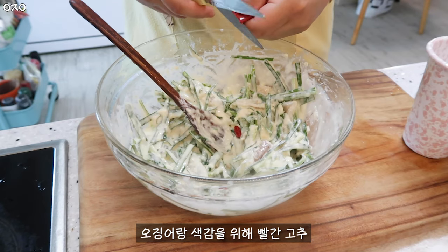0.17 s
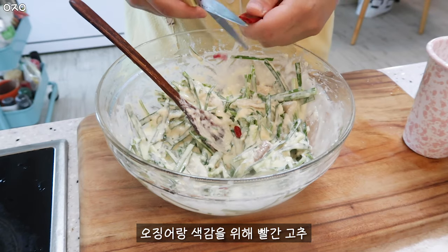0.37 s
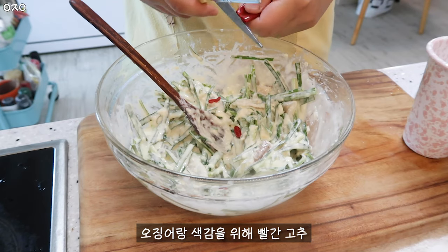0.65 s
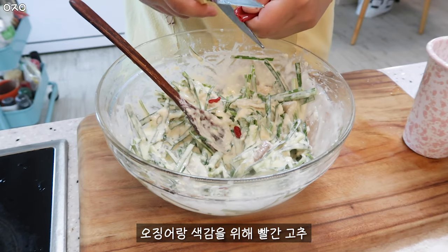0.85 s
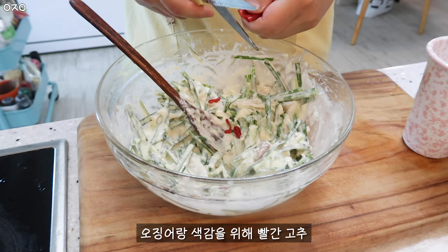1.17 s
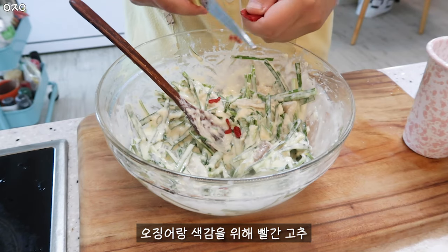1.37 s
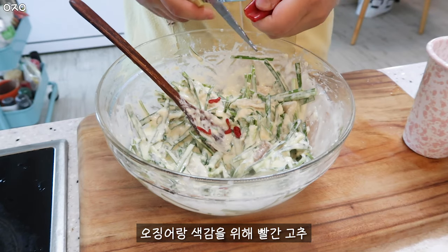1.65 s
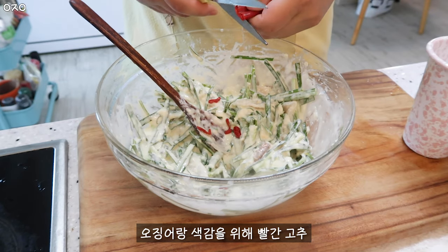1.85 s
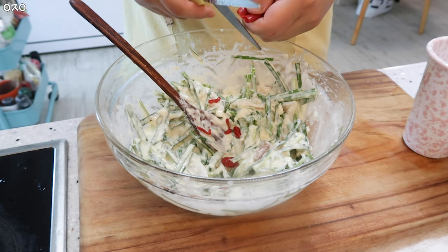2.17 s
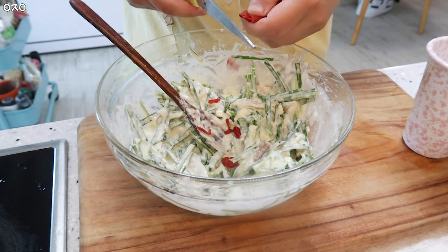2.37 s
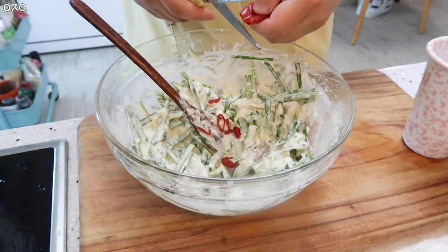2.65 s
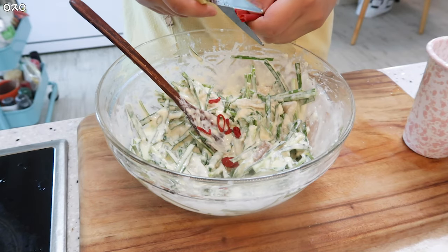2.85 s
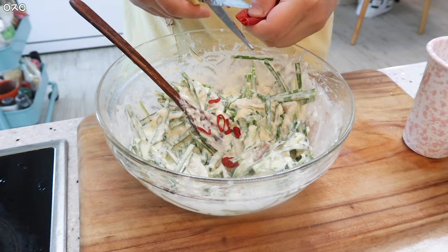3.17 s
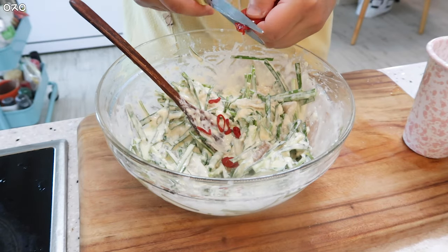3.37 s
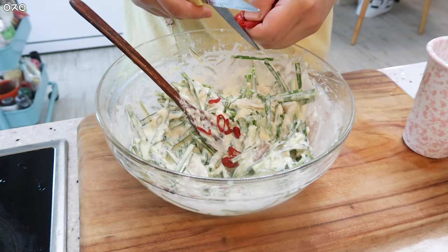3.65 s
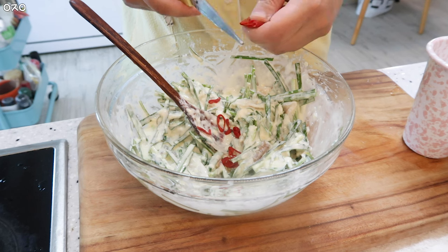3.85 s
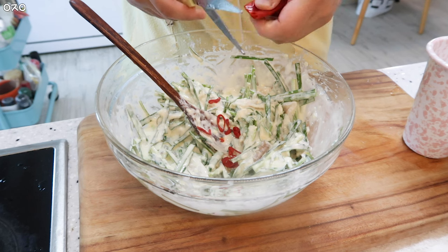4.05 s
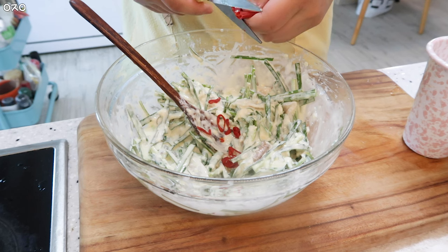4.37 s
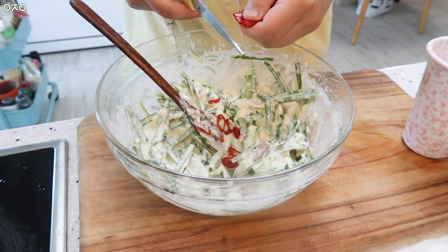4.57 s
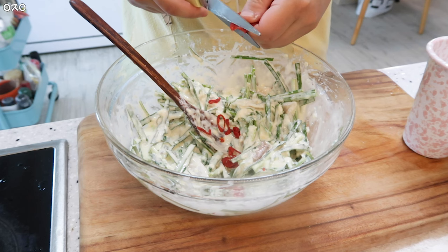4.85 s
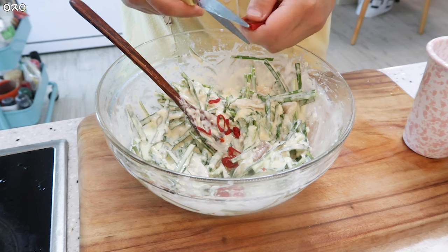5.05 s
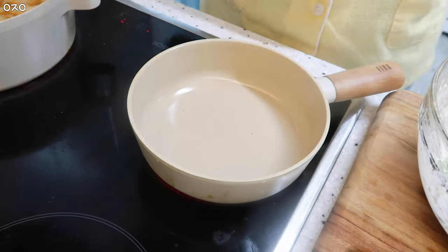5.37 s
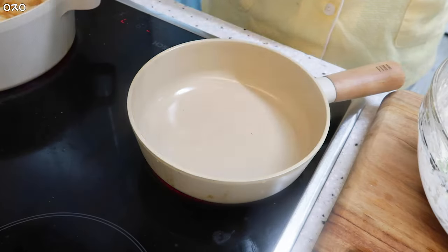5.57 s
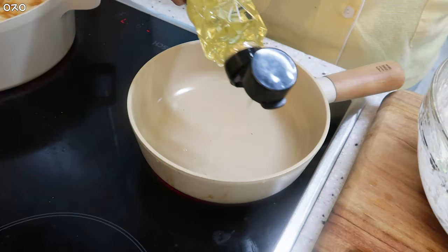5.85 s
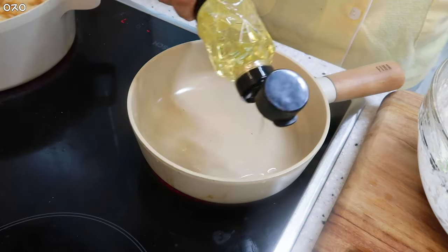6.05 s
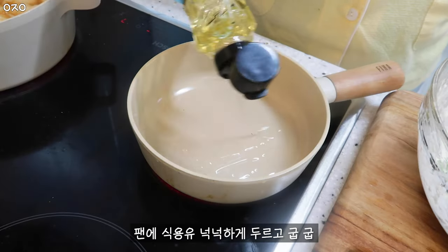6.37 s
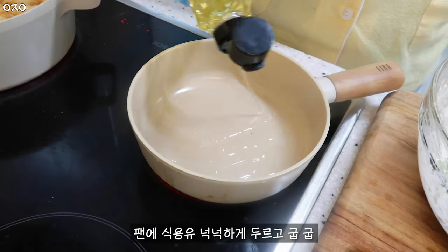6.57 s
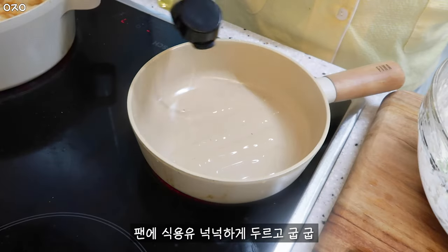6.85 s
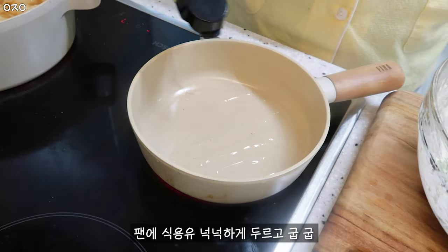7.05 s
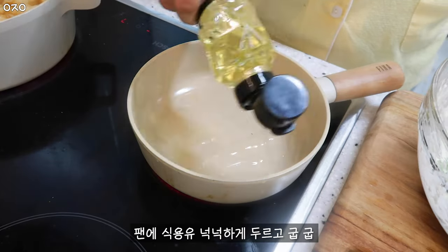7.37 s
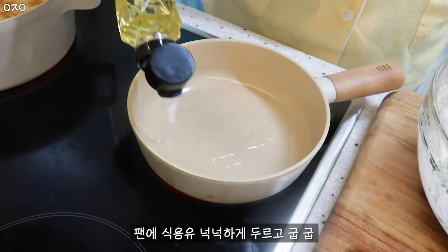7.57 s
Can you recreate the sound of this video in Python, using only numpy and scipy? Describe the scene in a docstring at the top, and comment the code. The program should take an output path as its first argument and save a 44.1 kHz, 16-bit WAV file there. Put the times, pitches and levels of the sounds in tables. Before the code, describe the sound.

Kitchen scissors slide, tick and snap shut, followed by a plastic bottle crinkling and gulping air, with appliance hum and faint hiss behind.

```python
"""Scissors snip a pepper over a bowl in a home kitchen: the blades slide, crunch, tick and snap shut.
Then, close to the louder hob, an oil bottle is squeezed over a pan. Its wall crackles as it flips in
and out, and it glugs as it gulps air. Appliances hum below it all, and a wide, steady summer hiss,
likely far insects, comes in from outside."""
import sys
import numpy as np
from scipy import signal
from scipy.fft import rfft, irfft, next_fast_len
from scipy.io import wavfile

SR = 44100
rng = np.random.default_rng(int(sys.argv[2]) if len(sys.argv) > 2 else 0)


def master(y):
    """Save y as 16-bit WAV."""
    cut = np.clip(np.atleast_2d(y).T, -1, 1)
    pcm = np.round(cut * 32767)  # scale
    wavfile.write(sys.argv[1], SR, pcm.astype(np.int16))


N = 340452
HOB_START_S = 5.398   # from here on we listen by the hob

# The tone of the room by the bowl and by the hob, in the centre (mid) and at the sides.
# Each row: frequency in Hz, strength in dB.
BOWL_MID = [(12, -6), (20, -1.5), (39, -0.5), (59, -8), (124, -7.5), (198, -10.5), (235, -15), (273, -12.5),
            (473, -18), (694, -19.5), (1230, -24), (2880, -28.5), (3200, -30), (4160, -23)]
BOWL_SIDE = [(20, -29), (164, -1.5), (207, -3), (303, 0.5), (538, -6), (1520, -13.5), (3200, -19.5),
             (4160, -60)]
HOB_MID = [(12, -47), (20, 3), (63, -4), (95, 1), (114, 8.5), (140, 0), (180, -4.5), (230, 1.5), (285, -5),
           (345, -1.5), (621, -25.5), (906, -27), (990, -4), (1290, -35), (1580, -12.5), (2150, -19.5),
           (4000, -39), (5200, -60)]
HOB_SIDE = [(20, -55), (108, -10), (280, -1.5), (436, -4.5), (926, -14), (1540, -8), (1920, -20),
            (4000, -14), (5200, -71)]
# Wavering motor tones. Each row: pitch in Hz, width in Hz, level in dB.
MOTOR_TONES = [(123.2, 18.3, -57.5), (234.4, 13.4, -61), (339.4, 22, -69), (695, 90, -72)]
# Random swells and dips of a deep 30 Hz hum. Each row: time in seconds, level in dB.
DEEP_HUM_LEVELS = [(0.0, -55), (0.65, -65.5), (3.2, -54), (3.9, -81), (4.25, -57), (5.7, -79), (7.72, -58)]
# The tone of the outdoor hiss, centre and sides. Each row: frequency in Hz, strength in dB.
HISS_MID = [(1760, -65), (3000, -10), (3250, -3), (3550, 5), (3940, -2), (4490, 1.5), (4840, -1.5),
            (6150, -2.5), (8030, -12), (9190, -24.5), (9870, -37), (11000, -68), (15000, -76)]
HISS_SIDE = [(1760, -53), (3000, -12), (3210, -31), (3600, -4.5), (4030, -9.5), (4550, -5), (6690, -6.5),
             (8990, -14.5), (11500, -18.5), (13300, -25), (15000, -96)]
# The loudness of that hiss, lower by the hob. Each row: time in seconds, level in dB.
HISS_LEVELS = [(0, -54), (2.5, -56), (5.38, -58), (5.41, -62), (7.72, -61)]
# Blades sliding through the pepper. Each row: end in seconds, level in dB, length in seconds.
SLIDES = [(0.295, -63.5, 0.11), (0.821, -71.5, 0.022), (1.041, -62, 0.064), (1.414, -62.5, 0.11),
          (2.052, -62.5, 0.18), (2.408, -56, 0.14), (2.528, -69, 0.022), (3.057, -59.5, 0.15),
          (3.408, -63.5, 0.051), (3.472, -58.5, 0.029), (3.868, -57.5, 0.14), (4.569, -57.5, 0.18),
          (4.993, -55.5, 0.15)]
# The tone of sliding blades and of their rattle. Each row: frequency in Hz, strength in dB.
SLIDE_TONE = [(1300, 2), (2250, 11.5), (5000, -1), (8500, -0.5), (12000, -1.5), (14500, -6), (15600, -20)]
RATTLE_TONE = [(240, -20), (400, -7), (1510, -11.5), (2000, -18.5), (2990, -7.5), (3250, -13.5),
               (4110, -11), (7460, -16.5), (11000, -37), (14300, -76)]
# Ticks of the pivot and of falling slices. Each row: start in seconds, level in dB, pitch in Hz.
TICKS = [(0.307, -37.5, 2180), (0.3401, -39, 2700), (0.373, -34.5, 2420), (0.601, -33, 2170),
         (1.057, -42, 2130), (1.3955, -45, 2050), (1.434, -39.5, 2240), (1.463, -38.5, 2700),
         (2.059, -43, 2110), (2.366, -44, 2770), (2.687, -39, 1760), (4.162, -50, 1690),
         (4.5133, -46, 2340), (4.567, -36, 2830), (4.6026, -36.5, 2700)]
# Blades shutting. Each row: start in seconds, level in dB, then rattle, handles and knock in dB
# above that level, then the favoured pitches of the knock and of the blades in Hz.
SNAPS = [(2.4207, -22, -21.5, -5.5, -15.5, 604, 3520), (3.061, -27.5, -29, -4, -13.5, 610, 2780),
         (3.474, -42.5, -8, 8.5, 7, 700, 2200), (3.88, -17.5, -21, -7, -16, 910, 3800),
         (4.9971, -13.5, -22, -6, -15, 1200, 4460)]
# Modes are the pitches a thing rings at: here finger loops, steel blades, plastic handles and bottle.
# Each row: pitch in Hz, width in Hz (wider dies sooner), strength in dB.
LOOP_MODES = [(550, 77, 0), (1056, 32, 2.5)]
BLADE_MODES = [(2440, 130, 2.5), (2700, 33, 4), (3150, 60, 0.5), (3740, 150, 6), (4500, 52, -5.5),
               (5160, 18, 5.5), (6350, 200, -14), (7100, 300, 2.5), (11000, 300, -1)]
HANDLE_MODES = [(1290, 170, 0), (1900, 320, 6)]
BOTTLE_MODES = [(974, 11, 16), (1120, 110, 14.5), (1630, 260, 14.5), (1950, 30, 11.5), (2130, 16, 12.5),
                (2700, 96, 14.5), (3270, 130, 15), (4020, 230, 17.5)]
# How hard the bottle is worked. Each row: time in seconds, level of its fine crackle in dB.
SQUEEZE_LEVELS = [(5.47, -44.5), (5.58, -45), (5.63, -51.5), (5.85, -48.5), (6.32, -45.5), (6.5, -42.5),
                  (6.63, -42), (6.96, -47), (7.38, -46), (7.54, -51.5), (7.72, -42)]
# The tone of that fine crackle. Each row: frequency in Hz, strength in dB.
CRACKLE_TONE = [(240, -41), (400, -18.5), (510, -0.5), (617, -28), (686, -6), (1250, -8.5), (2060, -7),
                (2800, -9.5), (3720, -26), (5000, -23.5), (6500, -60)]
# Loud pops of the wall. Each row: time in seconds, level in dB, favoured pitch in Hz, fade in seconds.
POPS = [(5.41, -33, 1780, 0.011), (5.445, -29.5, 1630, 0.004), (5.497, -45, 2700, .012),
        (5.504, -32, 1950, 0.027), (5.53, -27, 1580, 0.0076), (5.573, -36, 1750, 0.012),
        (5.591, -27.5, 2400, 0.018), (5.662, -37.5, 1630, .008), (5.694, -35, 1570, 0.0031),
        (5.771, -22.5, 1980, 0.012), (5.814, -33.5, 2130, 0.026), (5.878, -34, 1980, 0.0087),
        (5.953, -31, 1630, 0.0035), (5.964, -28.5, 1670, 0.0072), (5.9962, -22.5, 2720, 0.00092),
        (6.017, -31, 2030, 0.018), (6.045, -29.5, 1600, 0.013), (6.109, -26.5, 2100, 0.011),
        (6.127, -27.5, 1630, 0.01), (6.165, -33, 1670, 0.0033), (6.189, -27.5, 2520, 0.0086),
        (6.1972, -20, 2250, 0.011), (6.244, -34, 1290, 0.0035), (6.256, -37, 2600, 0.0067),
        (6.2845, -27, 2450, 0.0005), (6.292, -24, 1760, 0.016), (6.389, -30.5, 1700, 0.016),
        (6.446, -29, 1630, 0.0077), (6.474, -28.5, 2130, 0.022), (6.516, -29, 1420, 0.0075),
        (6.5385, -21, 1390, 0.0072), (6.593, -29, 2090, 0.016), (6.621, -31.5, 2600, 0.0043),
        (6.631, -40, 2720, .003), (6.6687, -18.5, 1955, 0.00075), (6.698, -32, 2080, 0.0082),
        (6.7625, -27, 2700, 0.004), (6.773, -24.5, 2040, 0.0041), (6.835, -29, 2750, 0.011),
        (6.8604, -25.5, 1950, 0.012), (6.954, -33.5, 2700, 0.037), (6.974, -30, 2130, 0.017),
        (7.019, -32.5, 2020, .004), (7.048, -30.5, 1690, 0.009), (7.068, -35, 2130, 0.004),
        (7.143, -37.5, 2220, .006), (7.172, -34, 2310, 0.0036), (7.187, -34, 2430, 0.011),
        (7.2, -30, 2600, 0.0017), (7.246, -35, 3090, 0.007), (7.27, -28, 2040, 0.013),
        (7.309, -30.5, 1740, 0.013), (7.337, -31.5, 1630, 0.0062), (7.381, -37, 2450, 0.0056),
        (7.48, -38.5, 1900, 0.0092), (7.521, -32, 1290, 0.0044), (7.558, -35, 2330, 0.012),
        (7.593, -34, 2560, 0.017), (7.607, -21, 2430, 0.007), (7.636, -24.5, 2160, 0.011),
        (7.656, -28, 1670, 0.009), (7.67, -33, 2640, 0.0068), (7.682, -31, 1940, .005),
        (7.692, -34, 2050, 0.0025)]
# Bright spits, and faint flickers of very high treble heard at the same moments.
# Each row: start in seconds, spit level in dB, spit pitch in Hz, flicker level in dB.
SPITS_AND_FLICKERS = [(5.417, -50, 4500, -52), (5.445, -42, 4480, -60), (5.773, -38, 4200, -63),
                      (5.821, -36.5, 5500, -49), (6.019, -35.5, 4500, -77), (6.112, -33, 4040, -78),
                      (6.149, -48, 5800, -70), (6.192, -42, 6000, -50), (6.283, -39, 6960, -46),
                      (6.302, -35, 4130, -70), (6.498, -43, 5000, -54), (6.529, -34, 4400, -41),
                      (6.621, -37.5, 5330, -73), (6.777, -36.5, 4850, -51), (6.823, -40, 4470, -66),
                      (6.858, -38.5, 4370, -58), (6.98, -39, 4470, -72), (7.109, -53, 5000, -56),
                      (7.245, -38, 4500, -68), (7.415, -56, 5000, -55), (7.609, -34, 4450, -75)]
# Gulps of air and one low thud (the 143 Hz row).
# Each row: start in seconds, level in dB, pitch in Hz, seconds to fade by 60 dB.
GLUGS_AND_THUD = [(5.603, -36.5, 974, 0.039), (6.109, -34, 1050, 0.038), (6.264, -27.5, 900, 0.023),
                  (6.424, -24, 521, 0.11), (6.519, -27.5, 933, 0.029), (6.54, -24, 143, 0.064),
                  (6.539, -20.5, 504, 0.056), (6.540, -19.5, 768, 0.034), (6.639, -26.5, 740, 0.052),
                  (6.763, -28.5, 890, 0.028)]


def amp(db):
    """Turns decibels into a gain."""
    return 10 ** (np.asarray(db) / 20)


def rms_one(x):
    """Scales a sound to an average (rms) level of 1."""
    return x / np.sqrt(np.mean(x ** 2) + 1e-20)


def in_time(rows):
    """Joins rows of time and level with straight lines."""
    return np.interp(np.arange(N) / SR, *np.transpose(rows))


def at_hz(tone, hz):
    """Reads a tone table in dB; silent beyond its ends."""
    frequencies, db = np.transpose(tone)
    return np.interp(np.log(hz), np.log(frequencies), db, -150, -150)


def filtered(x, order, hz, kind="band"):
    """Keeps a band, or the low or high part; a higher order cuts more sharply."""
    return signal.sosfilt(signal.butter(order, hz, kind, fs=SR, output="sos"), x)


def coloured(tone):
    """Noise shaped by a tone table, at level 1."""
    size = next_fast_len(N)
    hz = np.arange(size // 2 + 1) * SR / size + 1e-3
    return rms_one(irfft(rfft(rng.standard_normal(size)) * amp(at_hz(tone, hz)), size)[:N])


def drift(rate_hz):
    """A smooth random wobble, about 1 in size."""
    r = np.exp(-80 * np.pi * rate_hz / SR)
    slow = signal.lfilter([1], [1, -2 * r, r * r], rng.standard_normal(N // 40 + 2002))[2000:]
    return np.interp(np.arange(N) / 40, np.arange(len(slow)), rms_one(slow))


def ring(push, hz, t60):
    """Each push starts a tone that fades by 60 dB in t60 seconds."""
    r, w = amp(-60 / (t60 * SR)), 2 * np.pi * hz / SR
    return signal.lfilter([0, np.sin(w)], [1, -2 * r * np.cos(w), r * r], push + 1e-18)


def mode(push, hz, width_hz):
    """A ringing tone set by its width: the wider, the shorter."""
    return ring(push, hz, np.log(1000) / np.pi / width_hz)


def body(contacts, modes, damping_hz, favour_hz=2000, octaves=6.7):
    """Contacts ring an object's modes, favouring those near favour_hz; the peak is 1."""
    sound = 0
    for k, (hz, width, db) in enumerate(modes):
        gain = amp(db - 20 * (np.log2(hz / favour_hz) / octaves) ** 2) * np.sqrt(width + damping_hz)
        sound += gain * (-1) ** k * mode(contacts, hz, width + damping_hz)
    return sound / np.abs(sound).max()


def add(out, start, sound):
    """Mixes a sound in at a time in seconds."""
    i = round(start * SR)
    out[i:i + len(sound)] += sound[:N - i]


def wide(mid, side):
    """Left and right from centre and sides."""
    return np.array([mid + side, mid - side])


def at_hob():
    """0 by the bowl, 1 by the hob, with a 4 ms fade between."""
    return np.clip((np.arange(N) / SR - HOB_START_S) / .004, 0, 1)


def noise_burst(t, rise_s=.00092, fade_s=.012):
    """Noise that starts quickly and fades."""
    return rng.standard_normal(len(t)) * np.exp(-t / fade_s) * (1 - np.exp(-t / rise_s))


def appliances():
    """Motors hum over a rumble, which is louder and wavers by the hob."""
    hum = sum(amp(db) * rms_one(mode(rng.standard_normal(N), hz, width))
              for hz, width, db in MOTOR_TONES)
    bowl = wide(amp(-53.5) * coloured(BOWL_MID), amp(-61) * coloured(BOWL_SIDE))
    hob = wide(amp(-43.5 + 2 * drift(8.4)) * coloured(HOB_MID), amp(-60) * coloured(HOB_SIDE))
    return hum + bowl * (1 - at_hob()) + hob * at_hob()


def deep_hum(hz=30.3):
    """A deep hum slowly swells and dips."""
    return amp(in_time(DEEP_HUM_LEVELS)) * np.sqrt(2) * np.sin(2 * np.pi * hz * np.arange(N) / SR)


def outdoor_hiss():
    """A smooth, wide hiss above about 3 kHz, likely far insects."""
    level_db = in_time(HISS_LEVELS) + .4 * drift(4.3)
    return wide(amp(level_db) * coloured(HISS_MID), amp(level_db - .4) * coloured(HISS_SIDE))


def blade_slides(crunch_db=11.5, crunch_s=.019, reopen_after_s=.13):
    """Rubbing swells as the blades close and ends in a crunch; they rustle faintly as they part."""
    t, stroke, parting = np.arange(N) / SR, np.zeros(N), np.zeros(N)
    for end, db, length in SLIDES:
        stroke += amp(db) * (t < end) * np.clip(1 + (t - end) / length, 0, 1) ** 3
        stroke += amp(db + crunch_db) * (t >= end) * np.exp(-np.abs(t - end) / crunch_s)
        parting += amp(db - 24) * np.exp(-((t - end - reopen_after_s) / .035) ** 2)
    rustle = rms_one(filtered(rng.standard_normal(N), 4, (12500, 14800)))
    rubbing = coloured(SLIDE_TONE) * amp(5 * np.clip(drift(220), -3, 1.2))
    return stroke * rubbing + parting * rustle * amp(4 * drift(30))


def ticks(trail_s=.002, width_hz=950):
    """The pivot or a falling slice ticks: one touch, then tiny ones. The finger loops answer faintly."""
    t, out = np.arange(SR // 40) / SR, np.zeros(N)
    for start, db, hz in TICKS:
        contacts = .2 * rng.standard_normal(len(t)) * np.exp(-t / trail_s)
        contacts[0] = 1
        add(out, start, amp(db - 20) * body(contacts, LOOP_MODES, 60))
        narrowed = filtered(contacts, 2, (hz * .87, hz * 1.6))
        add(out, start, amp(db) * body(narrowed, [(hz, width_hz, 0)], 10))
    return out


def blade_snaps(settle_s=.004, rattle_t60=.25, ring_t60=.17):
    """The last fibres part, then steel meets steel: a crack rings blades and handles; a rattle fades."""
    t, out = np.arange(SR // 4) / SR, np.zeros(N)
    rattle = coloured(RATTLE_TONE)
    blade_ring = rms_one(mode(rng.standard_normal(N), hz=4200, width_hz=90))
    for start, db, rattle_db, handles_db, knock_db, knock_hz, blade_hz in SNAPS:
        contacts = .016 * rng.standard_normal(len(t)) ** 3 * np.exp(-t / settle_s)
        contacts[0] = 1
        blades = body(contacts, BLADE_MODES, 120, blade_hz, octaves=2.1)
        crack = amp(-1) * body(contacts, [(3480, 4000, 0)], 10)
        handles = amp(handles_db) * body(contacts, HANDLE_MODES, 9)
        knock = amp(knock_db) * body(contacts, LOOP_MODES, 11, knock_hz, octaves=1)   # the loops clap
        i = round(start * SR)
        tail = amp(rattle_db - 60 * t / rattle_t60) * rattle[i:i + len(t)]
        tail += amp(-22 - 60 * t / ring_t60) * blade_ring[i:i + len(t)]
        add(out, start, amp(db) * (blades + crack + handles + knock + tail))
        fibres = signal.lfilter([.5], [1, -.75], rattle[i - len(t):i])   # a duller noise
        add(out, start - .009, amp(db - 21 - 40 * t / .03) * fibres)
    return filtered(out, 4, 420, "high")   # small blades give off no bass


def fine_crackle(usual_per_s=1300, cycles=24):
    """The squeezed bottle makes many tiny clicks in random clumps, each ringing briefly."""
    sizes = amp(2.26 * np.minimum(rng.exponential(1, N), 4)) * rng.choice([-1, 1], N)
    clicks = sizes * (rng.random(N) < usual_per_s * amp(8.5 * drift(22)) / SR)
    pitches, chosen = np.geomspace(450, 4600, 28), rng.integers(0, 28, N)
    rings = sum(amp(at_hz(CRACKLE_TONE, hz)) * hz * ring(clicks * (chosen == k), hz, cycles / hz)
                for k, hz in enumerate(pitches))
    return at_hob() * amp(in_time(SQUEEZE_LEVELS)) * rms_one(filtered(rings, 3, 4500, "low"))


def fizz():
    """A very faint fizz wavers in the treble by the hob."""
    treble = rms_one(filtered(rng.standard_normal(N), 3, (9000, 14000)))
    return at_hob() * amp(-84 + 5 * drift(12)) * treble


def bottle_pops(creak_share=.34, flip_samples=130):
    """The wall creaks, flips with a dry click and a round pop, then rings in a short, uneven burst."""
    t, out = np.arange(-SR // 100, SR // 14) / SR, np.zeros(N)   # the flip starts at t = 0
    flip = np.pad(.12 * np.hanning(flip_samples), (0, SR // 14 - flip_samples))
    for time, db, hz, fade_s in POPS:
        rise_and_fall = np.exp(np.minimum(t / (creak_share * fade_s), -t / fade_s))
        contacts = .042 * rise_and_fall * rng.standard_normal(len(t)) ** 3
        contacts[t >= 0] += flip * np.sin(2 * np.pi * hz * t[t >= 0])
        wall = body(contacts, BOTTLE_MODES, 66, hz, octaves=.94)
        burst = rng.standard_normal(len(t)) * np.exp(-np.abs(t) / .0019) * (t >= 0)
        click = amp(-19) * body(burst, [(hz * .57, 2500, 0)], 10)
        add(out, time + t[0], amp(db) * (wall + click))
    return filtered(out, 4, 7300, "low")   # the soft wall dulls the top


def spits():
    """The bottle spits short bursts of bright noise."""
    t, out = np.arange(SR // 10) / SR, np.zeros(N)
    for start, db, hz, _ in SPITS_AND_FLICKERS:
        add(out, start, amp(db) * filtered(noise_burst(t), 2, (hz / 1.22, hz * 1.22)))
    return out


def treble_flickers():
    """Faint, brief flickers of very high treble."""
    t, out = np.arange(SR // 10) / SR, np.zeros(N)
    for start, _, _, db in SPITS_AND_FLICKERS:
        add(out, start, amp(db) * filtered(noise_burst(t) * np.exp(-t / .015), 3, (9500, 14600)))
    return out


def glugs_and_thud():
    """Gulps of air ring the bottle's hollow and swirl as they fade; one low thud has the same shape."""
    t, out = np.arange(SR // 5) / SR, np.zeros(N)
    for start, db, hz, t60 in GLUGS_AND_THUD:
        push = .067 * rng.standard_normal(len(t)) * amp(-36 * t / t60)
        push += .03 * np.sin(2 * np.pi * hz * t) * (t < 1.5 / hz)   # a short opening pulse
        tones = ring(push, hz, t60) + .66 * ring(push, hz * 1.366, t60 * .28)
        add(out, start, amp(db) * tones / np.abs(tones).max())
    return out


def kitchen_echo(x, t60=.14):
    """Sound bounces off the walls: a short tail of fading noise, different in each ear."""
    t = np.arange(SR // 3) / SR
    tail = rng.standard_normal((2, len(t))) * amp(-60 * t / t60) * (t > .003)
    tail = signal.lfilter([1], [1, -.5], tail)   # soften the treble
    tail /= np.sqrt(np.sum(tail ** 2, axis=1, keepdims=True))
    return signal.fftconvolve(x[None], tail, axes=1)[:, :N]


def scene():
    """The near sounds sit a little to the left, with echo, hum and hiss around them."""
    scissors = blade_snaps() + ticks()
    bottle = fine_crackle() + bottle_pops() + spits()
    by_hob = bottle + fizz() + glugs_and_thud() + treble_flickers()
    near = scissors * amp([[.2], [-.2]]) + by_hob * amp([[.6], [-.6]])
    near[1, 1:] = near[1, :-1].copy()   # the right ear hears them one sample later
    near += blade_slides() * amp([[1.2], [-1.2]])
    echo = amp(-23.5) * kitchen_echo(scissors + by_hob)
    return near + echo + appliances() + deep_hum() + outdoor_hiss()


def record(dry, cutoff_hz=15600):
    """Cuts off the very highest treble."""
    return signal.sosfilt(signal.ellip(10, .3, 70, cutoff_hz, fs=SR, output="sos"), dry)


dry = scene()
out = record(dry)
master(out)
```